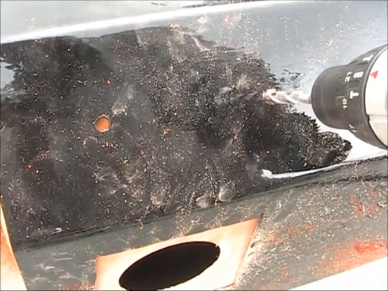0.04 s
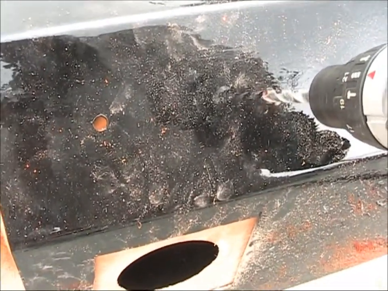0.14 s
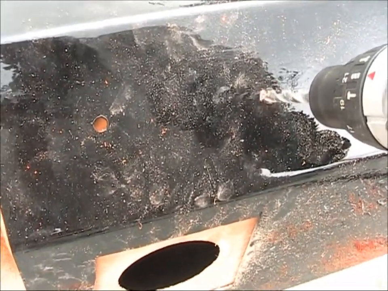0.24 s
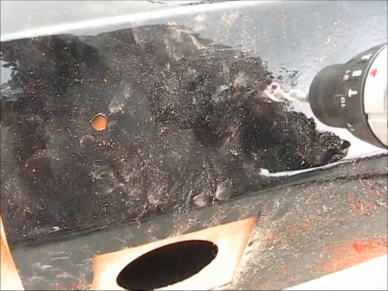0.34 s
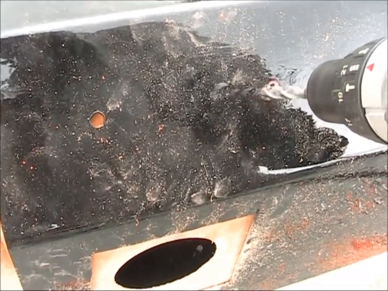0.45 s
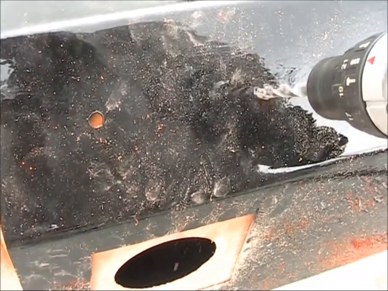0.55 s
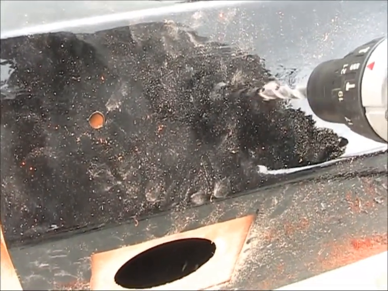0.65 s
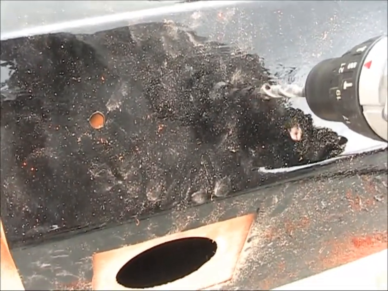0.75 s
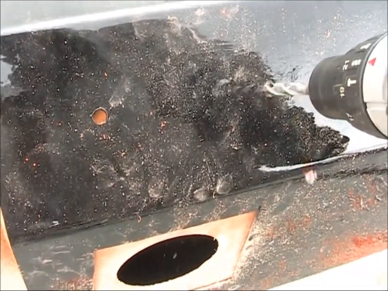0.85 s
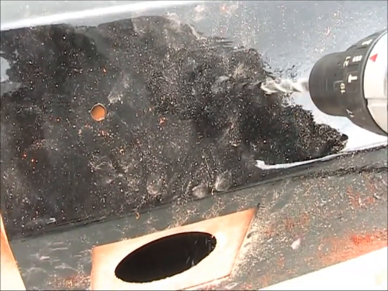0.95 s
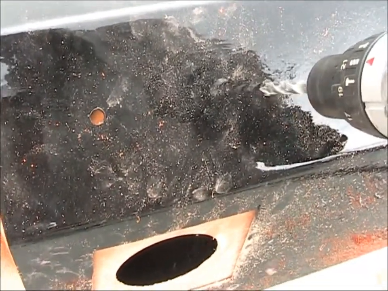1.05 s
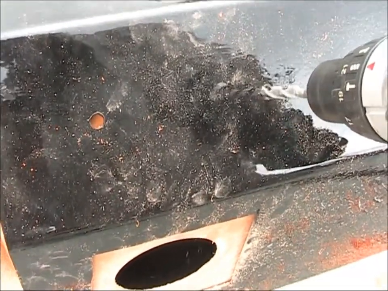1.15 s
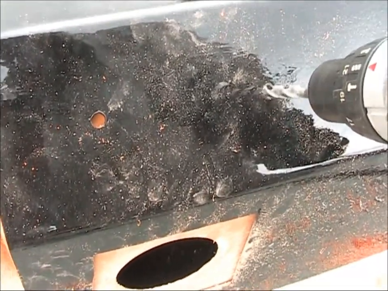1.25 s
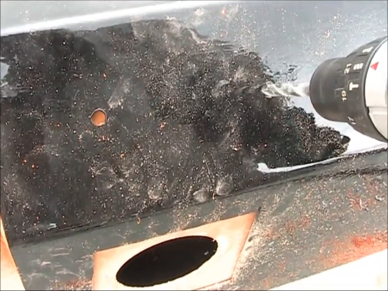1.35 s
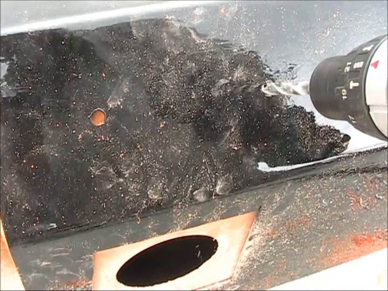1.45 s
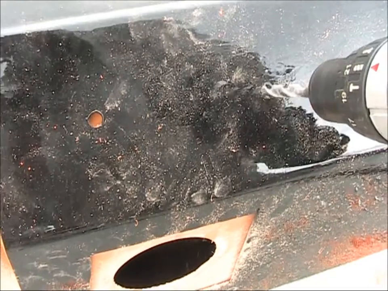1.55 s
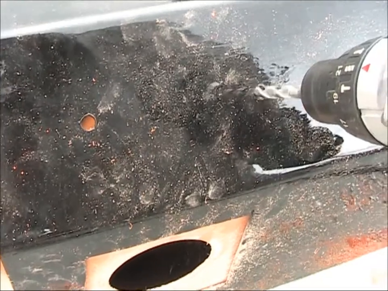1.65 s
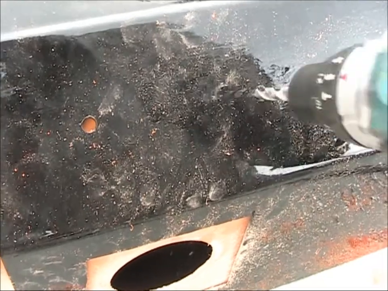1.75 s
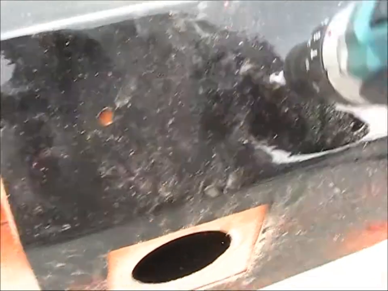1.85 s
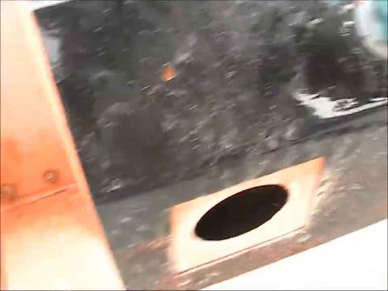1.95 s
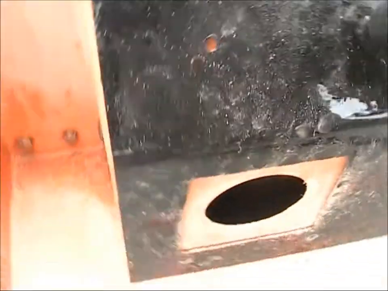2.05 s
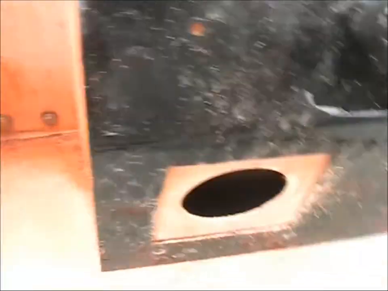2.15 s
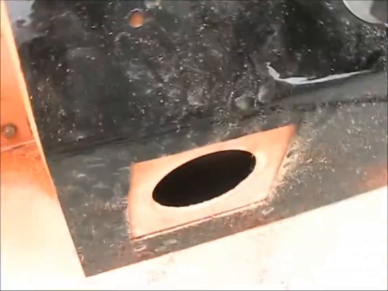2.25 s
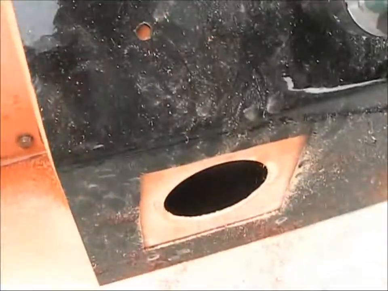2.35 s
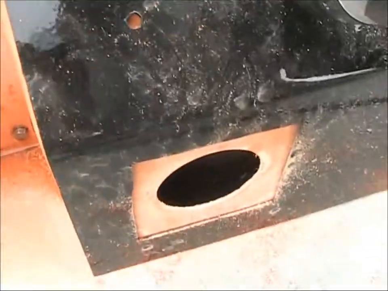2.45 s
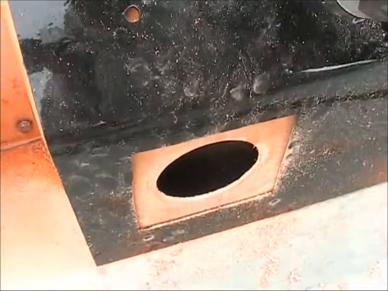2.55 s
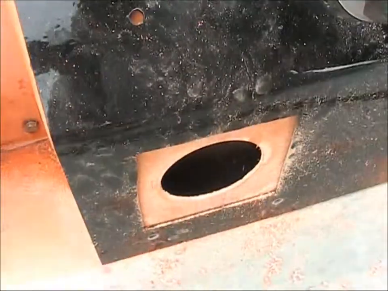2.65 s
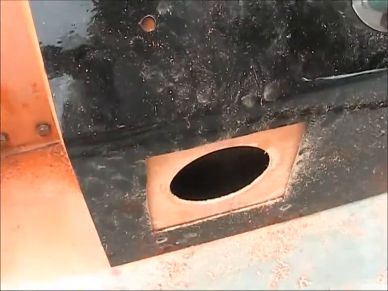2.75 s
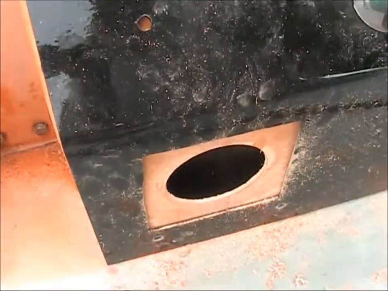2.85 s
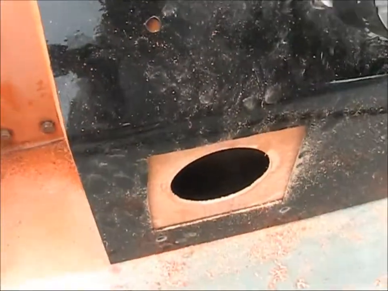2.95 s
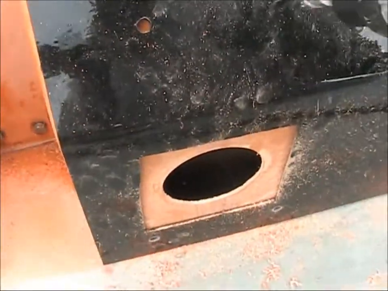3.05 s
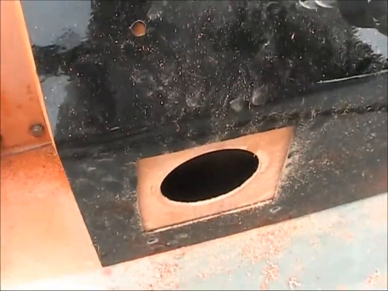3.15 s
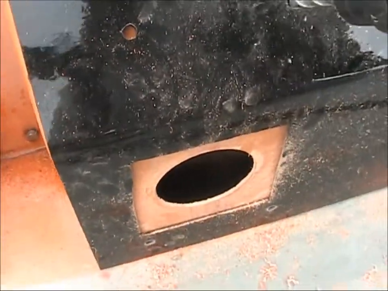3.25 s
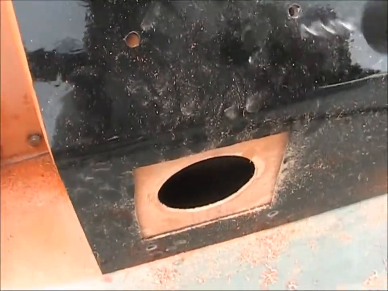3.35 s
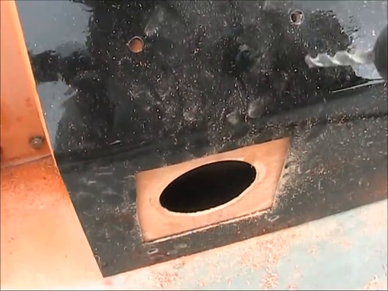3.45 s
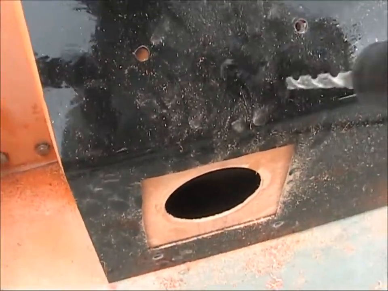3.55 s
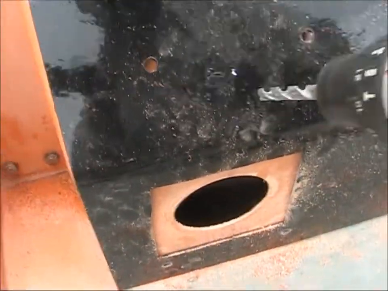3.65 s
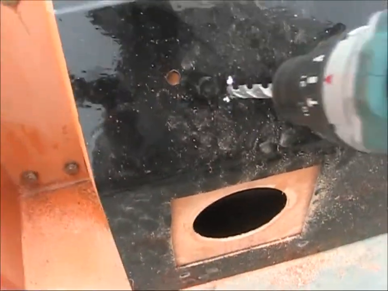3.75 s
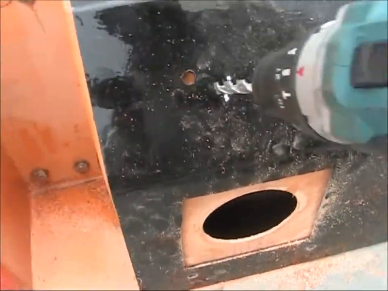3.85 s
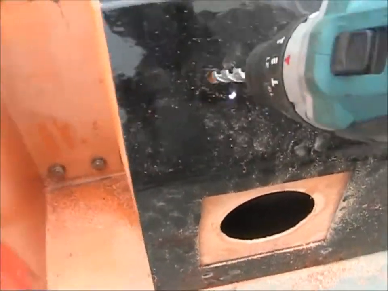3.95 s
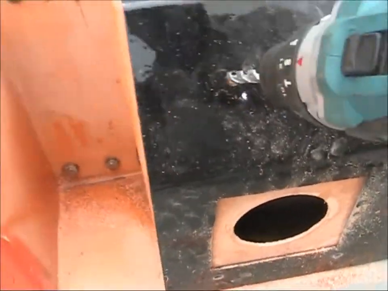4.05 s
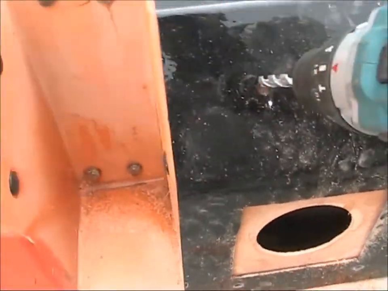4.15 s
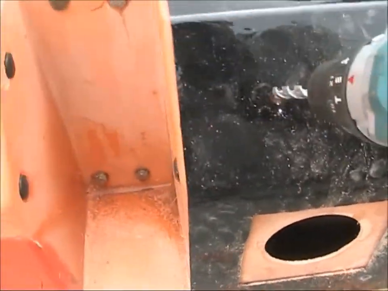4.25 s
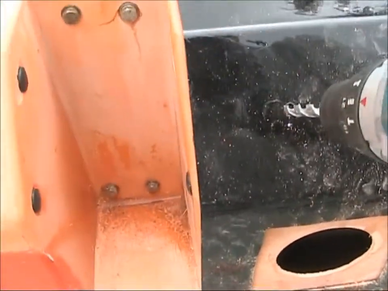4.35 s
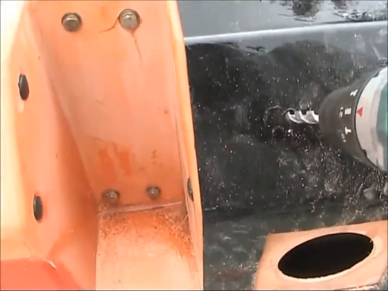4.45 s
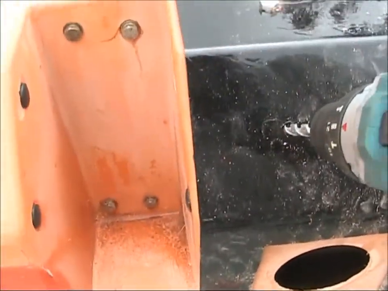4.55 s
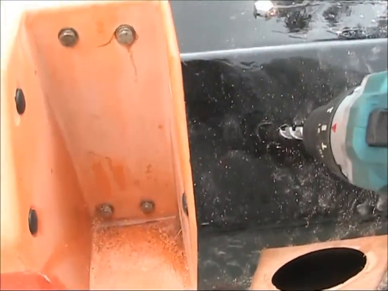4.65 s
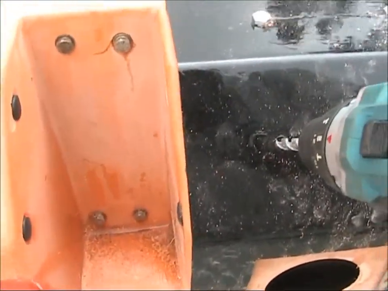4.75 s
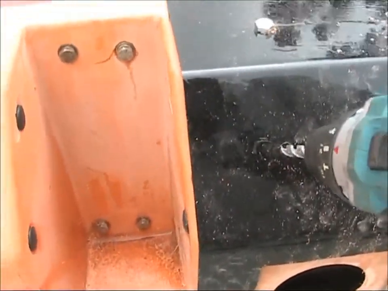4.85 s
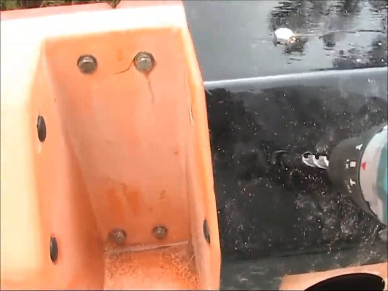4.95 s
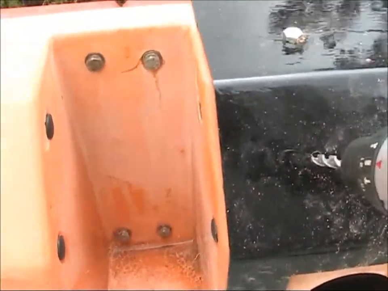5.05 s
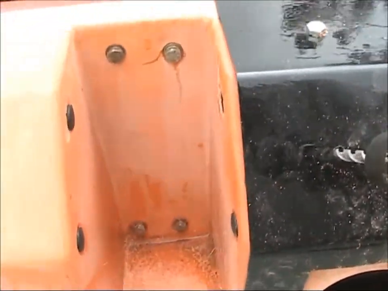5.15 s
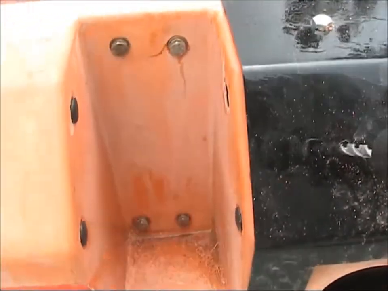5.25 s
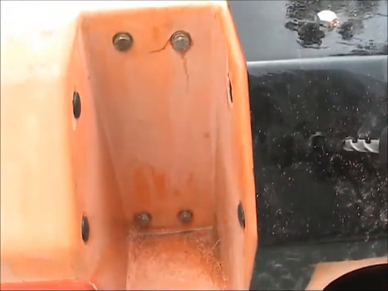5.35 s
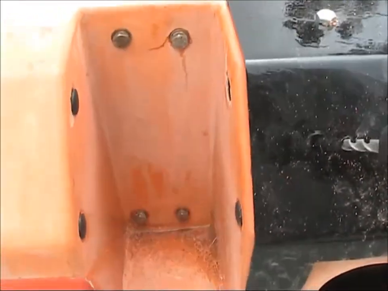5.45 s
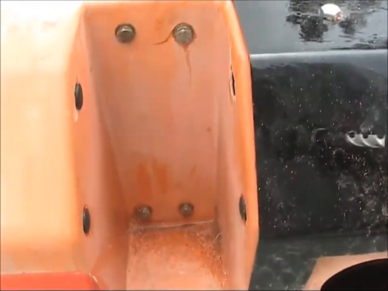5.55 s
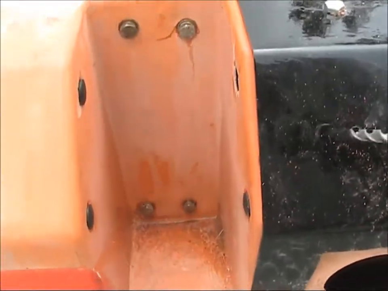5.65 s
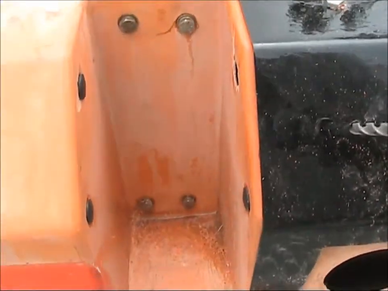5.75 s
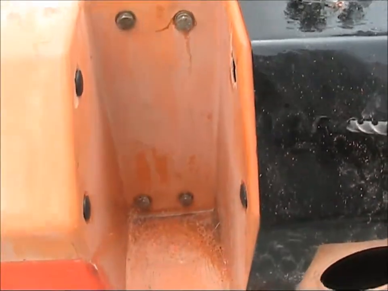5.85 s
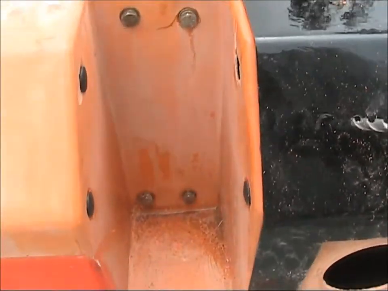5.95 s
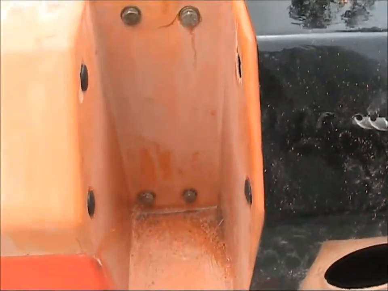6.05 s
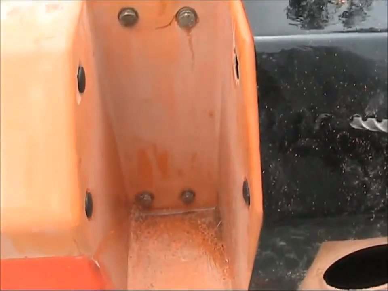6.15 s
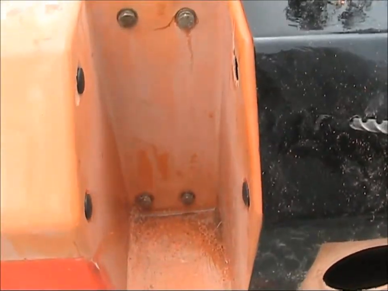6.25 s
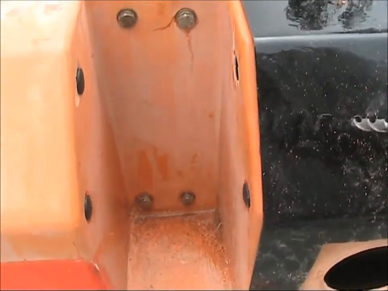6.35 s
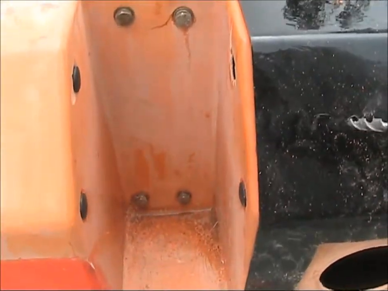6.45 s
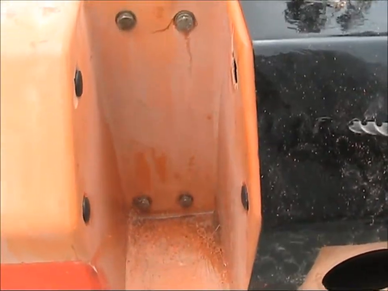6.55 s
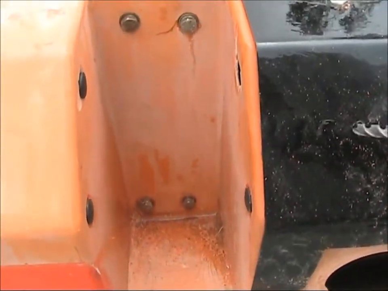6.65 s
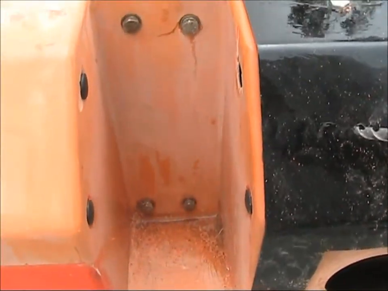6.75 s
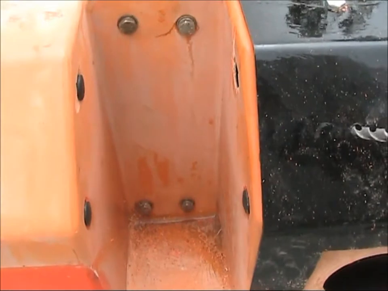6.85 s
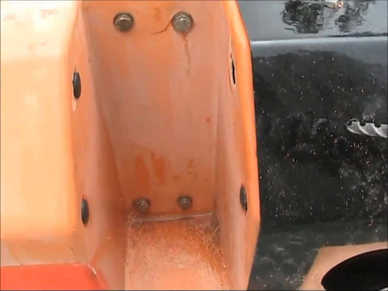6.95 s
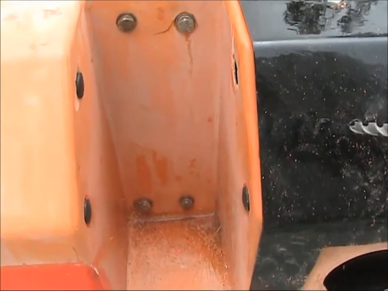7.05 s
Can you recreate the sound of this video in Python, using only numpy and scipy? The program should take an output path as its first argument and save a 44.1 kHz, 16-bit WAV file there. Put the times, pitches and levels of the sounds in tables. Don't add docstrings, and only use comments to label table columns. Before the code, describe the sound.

Outdoors at arm's length, a cordless drill runs with a steady high gear whine and harsh clatter while the boat panel drums under it. Knocks join as the bit is worked, then the drill brakes quickly. In the pause come small switch ticks, a faint bird, wind rumble, scraping metal and hard panel knocks. The trigger clicks and the drill spins up again to the end. A small stereo camera microphone catches it close and bright.

```python
import sys
import numpy as np
from scipy import signal
from scipy.fft import rfft, irfft
from scipy.io import wavfile
from scipy.ndimage import uniform_filter1d

SR = 44100
rng = np.random.default_rng(int(sys.argv[2]) if len(sys.argv) > 2 else 0)


def master_out(mix):
    frames = np.transpose(np.atleast_2d(mix))
    ceiling = np.clip(frames, -1, 1)
    pcm = np.round(ceiling * 32767).astype(np.int16)
    wavfile.write(sys.argv[1], SR, pcm)


def amplitude_ratio(level_db):
    exponent = np.asarray(level_db, float) / 20
    return 10 ** exponent


N = 313110

# hz, level_db (per Hz)
CLATTER_COLOUR = [(300, -9.5), (450, -16.5), (800, -12.5), (2000, -6), (3900, -1), (5400, -1.5),
                  (7700, -4.5), (9500, -3.5), (10200, -7), (11400, -5), (12100, -17.5), (14000, -15),
                  (15500, -6)]
# pitch_hz, width_hz, boost_db
CASING_RESONANCES = [(2290, 280, 4), (4300, 750, 4), (8080, 1550, 3.5)]


def shape(x, points, lo_hz=0, hi_hz=1e6, bumps=()):
    f = np.fft.rfftfreq(N, 1 / SR) + 1e-3
    hz, db = np.transpose(points)
    db = np.interp(np.log(f), np.log(hz), db) + resonance_db(f, bumps)
    edges = 1 / np.sqrt((1 + (lo_hz / f) ** 8) * (1 + (f / hi_hz) ** 8))
    y = irfft(rfft(x) * amplitude_ratio(db) * edges, N)
    return y / np.sqrt(np.mean(y ** 2))


def resonance_db(hz, bumps):
    return sum(db / (1 + (2 * (hz - centre) / width) ** 2) for centre, width, db in bumps)


def walk(rate):
    hold = int(SR / rate)
    steps = np.repeat(rng.standard_normal(N // hold + 1), hold)
    return 1.279 * uniform_filter1d(uniform_filter1d(steps, hold), hold)[:N]


def columns(rows):
    s, *cols = np.transpose(rows)
    return [np.interp(np.arange(N) / SR, s, c) for c in cols]


def swells(rows, calm_db):
    t = np.arange(N) / SR
    power = amplitude_ratio(2 * calm_db) + sum(amplitude_ratio(2 * db) * np.exp(-2 * ((t - s) / half) ** 2) for s, db, half in rows)
    return 10 * np.log10(power)


def ports(near, bearing, right_db):
    # hz, left_lead_radians
    port_phase = [(0, -2.5), (260, 0.63), (950, -0.14), (2500, 0.4), (3010, 0.6), (4910, -1.45),
                  (7240, -1.1), (7670, -1.38), (8700, -1.44), (9040, -1.5), (9910, -1.76), (10400, -2.5),
                  (12300, -3), (15300, -3)]
    f = np.fft.rfftfreq(N, 1 / SR)
    phase = np.interp(f, *np.transpose(port_phase))
    shade = amplitude_ratio(-right_db * np.exp(-np.log(f / 4000 + 1e-6) ** 2))
    ahead, aside = (irfft(rfft(near) * shade * np.exp(1j * phase * k), N) for k in (.8, 1.2))
    left = ahead + (aside - ahead) * (bearing - .8) / .4
    return np.array([left, near])


def motor():
    # start_s, full_trigger_shaft_hz, clatter_db, bit_pressure_db, shank_rub_db
    handling = [(0.0, 378.7, -17.5, -0.5, -1), (1.42, 380.4, -17.5, 0.5, 0), (1.72, 376.5, -17, 1.5, 4),
                (1.83, 369, -18.5, 5.5, -3), (1.98, 378, -20.5, 5.5, 4.5), (2.06, 365.4, -19, 4, 4),
                (2.15, 370.5, -19, 3, 2.5), (2.37, 378.5, -17.5, 1, 7), (2.52, 376, -18, 3.5, 6.5),
                (2.68, 386, -16.5, 1.5, 8), (3.02, 380, -18.5, 6, -1), (3.22, 380.5, -18, 6, 5.5),
                (3.44, 387.2, -16.5, -4, 4.5), (3.5, 372.9, -17.5, 2, 2), (5.65, 384.2, -18.5, -2, -2),
                (6.7, 379.5, -18.5, 0.5, -2), (6.76, 381.2, -19, 0, -4.5), (7.1, 381.6, -18, 2, -1)]
    pull_s, mesh_s = 5.14, 5.17
    spin_up_s, spin_up_bend = .107, 1.55
    release_s, halt_s = 3.5, 3.6
    brake_s, brake_bend = .056, 1.2
    bit_out_s = 3.34
    surge_db = 1.8
    full_hz, level_db, press_db, rub_db = columns(handling)
    t = np.arange(N) / SR
    second = t > (halt_s + pull_s) / 2

    rising = 1 - np.exp(-(np.clip(t - pull_s, 0, None) / spin_up_s) ** spin_up_bend)
    falling = np.exp(-(np.clip(t - release_s, 0, None) / brake_s) ** brake_bend)
    share = np.clip(np.where(second, rising, falling), .05, 1)
    change = np.gradient(share) * full_hz * SR / 1000
    lift_db = surge_db * np.clip(change, 0, None)
    fade_db = np.where(second, 30, 41) * np.log10(np.clip(share / 0.63, 0, 1))
    slow = np.log10(share)

    whine_db = np.where(second, -4, -6.5) - .45 * np.clip(-change, 0, None) + 22 * slow + .9 * walk(18)
    hum_db = -37 + rub_db + 90 * slow + 1.85 * walk(14)
    clatter_db = level_db + fade_db + lift_db
    drum_db = -31.5 + 0.98 * press_db + 0.62 * fade_db + 1.86 * lift_db
    free = np.where(second, 0, np.clip((t - bit_out_s) / .1, 0, 1))
    cut_db = -34 + 0.77 * press_db - 35 * free
    stopping = amplitude_ratio(-900 * np.clip(t - halt_s, 0, 1))
    on = np.where(second, np.clip((t - mesh_s) / 0.0067, 0, 1), stopping)
    return full_hz * share, whine_db, hum_db, clatter_db, drum_db, cut_db, second, on


def gear_whine(phase, hz, whine_db, hum_db, clatter_db, second):
    multiples = [2, 3, 4, 8, 9, 11, 13, 14, 18, 20, 21, 22, 23, 24, 25, 26, 28, 29, 30, 34, 40]
    first_run_db = [-10.5, -18.5, -16.5, -11.5, -10, -17.5, -12.5, -8.5, -28, -11, -22, -27, -8.5, -15, -19,
                    -26, -28, -26, -10, -27, -27]
    second_run_db = [-13.5, -19.5, -46, -13, -39, -19, -12.5, -12, -24, -3.5, -19, -7.5, -11.5, -6, -24,
                     -16.5, -13, -1.5, -11, -20, -28.5]
    thin_db = 25 * np.log10(np.clip(hz / 230, 0, 1))
    thin_db += 6 * np.clip(-np.gradient(hz) * SR / 5000, 0, 1)
    lines = amplitude_ratio(clatter_db + whine_db + thin_db + 0.25 * walk(45)) * np.sin(10 * phase)
    lines += amplitude_ratio(hum_db) * np.sin(phase)
    spin_db = 45 * np.log10(hz / 380)
    for order, first_db, second_db in zip(multiples, first_run_db, second_run_db):
        wobble_db = 1.5 * walk(25)
        speed_share = 1 if order < 5 else .1 if order < 27 else .9
        line_db = clatter_db - 7 + spin_db * speed_share + np.where(second, second_db, first_db) + wobble_db
        line_db += 1.37 * resonance_db(order * hz, CASING_RESONANCES)
        lines += amplitude_ratio(line_db) * np.sin(order * (phase + .006 * walk(30)))
    return lines


def rattle(phase, depth, scatter_db):
    impact = amplitude_ratio(scatter_db * rng.exponential(size=N))
    return rng.standard_normal(N) * impact * (1 + depth * np.cos(phase))


def gear_clatter(phase, hz, clatter_db):
    t = np.arange(N) / SR
    facing = np.clip(np.minimum(t - 1.75, 3.8 - t) / .15, 0, 1)
    flicker_db = .45 * walk(14)
    impacts = shape(rattle(phase, 0.027, 1.47), CLATTER_COLOUR, 1300, 16000, CASING_RESONANCES)
    vents = shape(rng.standard_normal(N), [(9000, 0), (15500, 1.5)], 11800)
    gears = amplitude_ratio(clatter_db + 0.1 + flicker_db) * impacts + amplitude_ratio(clatter_db - 10.5) * facing * vents
    dull = uniform_filter1d(gears, size=6)
    return dull + (gears - dull) * np.clip(hz / 200, 0, 1) ** 0.64


def panel_drone(phase, drum_db, cut_db, bite):
    # hz, level_db (per Hz)
    thrum_colour = [(60, -16), (110, -8), (150, 2.5), (200, -5.5), (265, -4.5), (330, -11), (600, -31.5)]
    drum = shape(rattle(phase, 0.048, 0.92), CLATTER_COLOUR, 350, 1510)
    drum *= amplitude_ratio(drum_db + 1.0 + 1.42 * walk(14))
    cut = amplitude_ratio(cut_db - 1.5 + 1.77 * walk(20)) * bite * shape(rng.standard_normal(N), thrum_colour)
    return drum + cut


def drill():
    # start_s, share_of_port_phase
    drill_bearing = [(0, 0.96), (1.7, 0.99), (1.85, 0.81), (2.3, 0.92), (2.7, 0.8), (3.1, 0.86),
                     (3.5, 1.05), (5.2, 1), (7.1, 1.1)]
    hz, whine_db, hum_db, clatter_db, drum_db, cut_db, second, on = motor()
    phase = 2 * np.pi * np.cumsum(hz * (1 + 0.002022 * walk(40))) / SR
    lines = gear_whine(phase, hz, whine_db, hum_db, clatter_db, second)
    bite = 1 + .5 * np.cos(phase / 41 + 1.22 * walk(3.01))

    def noise(panel_db):
        gears = gear_clatter(phase, hz, clatter_db)
        return gears + amplitude_ratio(panel_db) * panel_drone(phase, drum_db, cut_db, bite)

    direct = np.sqrt(2) * lines + noise(panel_db=0)
    scattered = amplitude_ratio(-5.5) * np.array([noise(panel_db=-5), noise(panel_db=-5)])
    return on * (ports(direct, columns(drill_bearing)[0], right_db=2.5) + scattered)


def wind():
    # hz, level_db (per Hz)
    rumble_colour = [(12, -37.5), (20, -11), (97, 0.5), (205, -10.5), (357, -31), (406, -30), (447, -35.5),
                     (900, -43), (1170, -81), (1980, -120)]
    # hz, level_db (per Hz)
    hiss_colour = [(150, -41), (300, -5.5), (450, -7.5), (650, -12.5), (1500, -19), (2300, -19),
                   (3000, -23.5), (4500, -23), (8000, -32.5), (15500, -38.5)]
    # peak_s, peak_db, half_length_s
    gust_swells = [(0.1, -36.5, 0.28), (0.55, -37, 0.17), (0.95, -39, 0.13), (1.16, -39, 0.08),
                   (1.55, -44.5, 0.31), (2.0, -46, 0.19), (2.27, -37, 0.058), (2.55, -55, 0.077),
                   (2.95, -50, .1), (3.28, -45, .08), (3.78, -56, 0.087), (4.15, -39, 0.24),
                   (4.5, -30.5, 0.09), (4.72, -32, 0.15), (4.93, -34, 0.15), (5.2, -36, 0.11),
                   (5.5, -43.5, 0.19), (6.0, -51, .2), (6.5, -56, 0.071), (7.0, -56, .15)]
    # peak_s, peak_db, half_length_s
    hiss_swells = [
        (3.92, -56.5, .07),
        (4.12, -50, 0.2),
        (4.55, -46.5, 0.23),
        (4.8, -53, 0.21),
    ]
    rumble_db = swells(gust_swells, calm_db=-62)
    pan_db = 7 + 2.5 * walk(6)
    gusts = [amplitude_ratio(2.5 * walk(21.97)) * shape(rng.standard_normal(N), rumble_colour) for _ in range(2)]
    rumble = np.array([gusts[0] - .45 * gusts[1], gusts[1] - .45 * gusts[0]])
    far = [shape(rng.standard_normal(N), hiss_colour) for _ in range(3)]
    hiss_db = swells(hiss_swells, calm_db=-60) + 2.0 + 0.91 * walk(10)
    hiss = amplitude_ratio(hiss_db) * (ports(far[0], 0.95, right_db=0.0) + 1.14 * np.array(far[1:]))
    return rumble * amplitude_ratio(rumble_db + 5.5 + np.array([pan_db, -pan_db]) / 2) + hiss


def strikes(events, modes, rough, scatter_db, crack_db, crack_hz, tail):
    out, t = np.zeros(N + SR), np.arange(SR // 2) / SR
    hz, db, t60 = (c[:, None] for c in np.transpose(modes))
    dull = signal.butter(4, [crack_hz / 8, crack_hz], "band", fs=SR, output="sos")
    no_thud = signal.butter(2, 120, "high", fs=SR, output="sos")
    for s, peak_db, contact, tilt_db, spot_hz in events:
        spot_db = 10.0 * np.exp(-2 * np.log2(hz / spot_hz) ** 2)
        scatter = scatter_db * rng.standard_normal(hz.shape)
        gain = amplitude_ratio(db + tilt_db * np.log2(hz / 700) + spot_db + scatter)
        decay = np.exp(-np.log(1000) * t / np.clip(t60, .004, .3))
        ring = np.sum(gain * decay * np.sin(2 * np.pi * hz * t), axis=0)
        touch = t / max(contact, 5e-5)
        push = np.exp(-touch) * (1 - np.exp(-4 * touch))
        scrape = (1 - rough + rough * rng.standard_normal(len(t))) * push
        hit = signal.fftconvolve(scrape, ring)[:len(t)]
        crack = rng.standard_normal(len(t)) * (push + 0.34 * np.exp(-t / max(tail, 1e-3)))
        hit = hit / np.abs(hit).max() + amplitude_ratio(crack_db + 1.26 * tilt_db) * signal.sosfilt(dull, crack)
        start = int(s * SR)
        out[start:start + len(t)] += amplitude_ratio(peak_db) * signal.sosfilt(no_thud, hit)
    return out[:N]


def panel_knocks():
    # pitch_hz, level_db, t60_s
    panel_modes = [(195, -14, 0.1), (288, -1.5, 0.06), (520, -47.5, 5.0), (678, -6.5, 0.12),
                   (777, -10, 0.096), (889.7, -14, 0.11), (1008, -14, 0.15), (1120, -14, 0.14),
                   (1400, -36, 0.176), (1560, -29, 0.18), (2010, -41, 0.094), (2320, -36, 0.1),
                   (2445, -14, 0.061), (3600, -19, 0.07)]
    # start_s, peak_db, contact_s, brightness_db (per octave), favoured_hz
    knock_events = [(1.76, -20, .0004, 0, 200), (1.80, -14, 0.00037, -3, 230),
                    (1.819, -14.5, .0001, 13, 1800), (1.862, -17, .0002, 2, 280),
                    (1.891, -9, 0.00016, 5.5, 290), (1.965, -12.5, .0001, -6, 1300),
                    (2.234, -8.5, 0.000072, 6.5, 800), (2.249, -13, 0.0011, -4.5, 160),
                    (2.873, -18, .0004, -4, 270), (2.927, -10, 0.00014, -1, 760),
                    (2.95, -10, .0001, 0, 1150), (2.978, -10, .0002, -3, 790),
                    (3.036, -16, 0.00042, 3, 280), (3.01, -14.5, 0.00035, -2, 280.3),
                    (4.636, -5.5, 0.00021, -2.5, 750), (4.645, -16, 0.00015, 1.5, 600),
                    (4.654, -6, 0.00043, -16, 240), (5.166, -11, 0.00024, -6.5, 650),
                    (5.185, -14, 0.00017, 4, 1200), (5.22, -10, 0.00023, 2, 660)]
    return strikes(knock_events, panel_modes, rough=0, scatter_db=2.5, crack_db=3.0, crack_hz=2500, tail=0.015)


def trigger_ticks():
    # pitch_hz, level_db, t60_s
    trigger_modes = [(1699, -4, 0.012), (3300, -7, 0.024), (4600, 5, 0.0075), (7350, -7, 0.0086),
                     (8740, -16, 0.0036), (11100, -13, .006)]
    # start_s, peak_db, contact_s, brightness_db (per octave), favoured_hz
    tick_events = [
        (3.5486, -17, 0.00097, 0, 4030),
        (3.5888, -23, 0.00088, 0, 4600),
        (3.6126, -22, 0.00056, 0, 3350),
        (3.6227, -25, 0.0011, 0, 3800),
        (3.7045, -47, 0.001, 0.0029, 4000),
        (4.9755, -39.5, 0.001, 0, 3450),
        (5.1368, -24.5, 0.00092, 0.003, 3110),
    ]
    return strikes(tick_events, trigger_modes, rough=1, scatter_db=3.5, crack_db=0.5, crack_hz=12000, tail=0.0066)


def bird():
    # start_s, pitch_hz, level_db
    call = [
        (3.68, 4600, -110),
        (3.71, 4300, -67),
        (3.74, 3680, -55),
        (3.8, 3700, -54),
        (3.84, 3300, -63),
        (3.88, 3260, -110),
    ]
    hz, db = columns(call)
    hoarse = uniform_filter1d(rng.standard_normal(N), size=60) * np.sqrt(60)
    return amplitude_ratio(db - 3.0) * hoarse * np.sin(2 * np.pi * np.cumsum(hz) / SR)


def metal_rings():
    # pitch_hz, level_db, t60_s
    metal_modes = [(181, -0.5, 0.11), (523, -8, 0.17), (660, -9, 0.18), (798, -15, 0.069),
                   (960, -13.5, 0.2), (1060, -13, 0.31), (1130, -15.5, .22), (1230, -14, 0.16),
                   (1413, -12, 0.17), (1670, -17.5, 0.17), (1697, -17.5, 0.16), (2060, -28, .15),
                   (2300, -32, .12), (3070, -22, 0.09), (3400, -21, 0.1), (4000, -13.5, 0.089),
                   (4410, -18, 0.11), (5520, -26, 0.14), (8037, -32, .2), (8742, -31, .25),
                   (9700, -44, 0.18)]
    # start_s, peak_db, contact_s, brightness_db (per octave), favoured_hz
    ring_events = [
        (4.325, -16.5, 0.012, 0, 750),
        (4.34, -20, 0.034, -3.5, 190),
        (4.433, -21, 0.023, -0.2, 1060),
        (4.465, -17, 0.0048, -4.5, 500),
        (4.49, -32, 0.011, 1, 4500),
        (4.523, -21, 0.011, 4, 1700),
        (4.585, -33, .015, 7, 1230),
        (4.625, -33, .006, 4, 4400),
    ]
    return strikes(ring_events, metal_modes, rough=0.95, scatter_db=2.5, crack_db=-14.0, crack_hz=2500, tail=0.052)


def scene():
    contacts = ports(panel_knocks() + metal_rings(), 0.87, right_db=-0.5)
    ticks = ports(trigger_ticks(), 1.0, right_db=2.5)
    return drill() + contacts + ticks + bird() + wind()


def low_pass(x):
    return signal.sosfilt(signal.butter(12, 15740, fs=SR, output="sos"), x)


def record(dry):
    rounded = np.tanh(1.1 * dry) / 1.1
    top_cut = signal.ellip(8, .2, 60, 15380, fs=SR, output="sos")
    return low_pass(signal.sosfilt(top_cut, rounded))


dry = scene()
out = record(dry)
master_out(out)
```